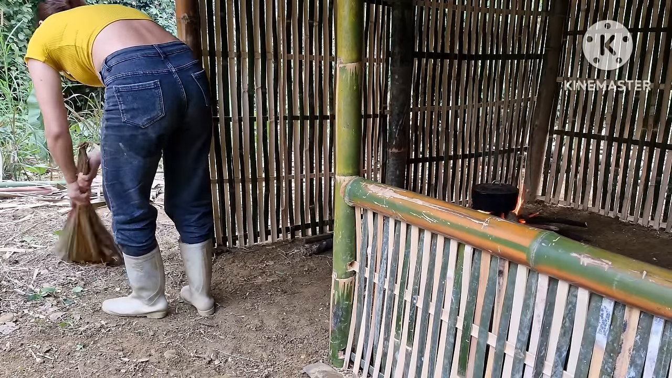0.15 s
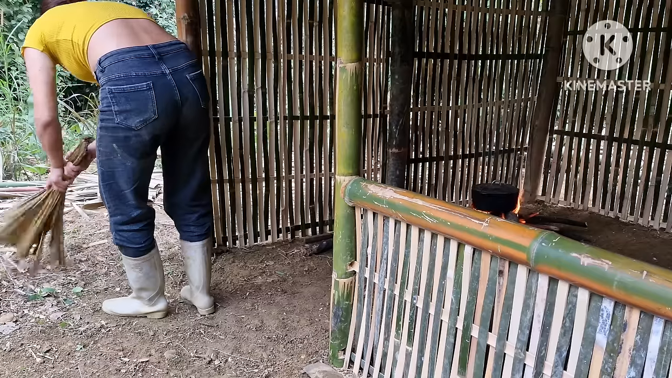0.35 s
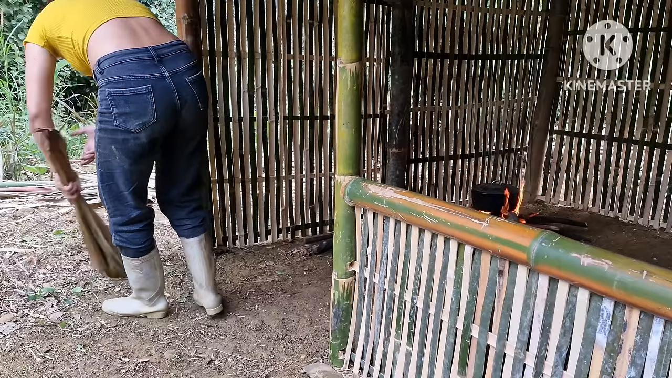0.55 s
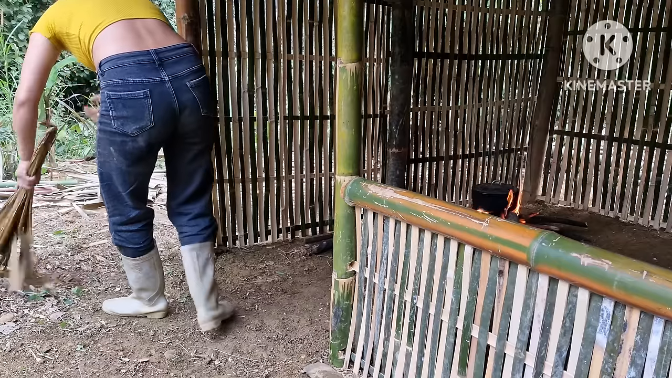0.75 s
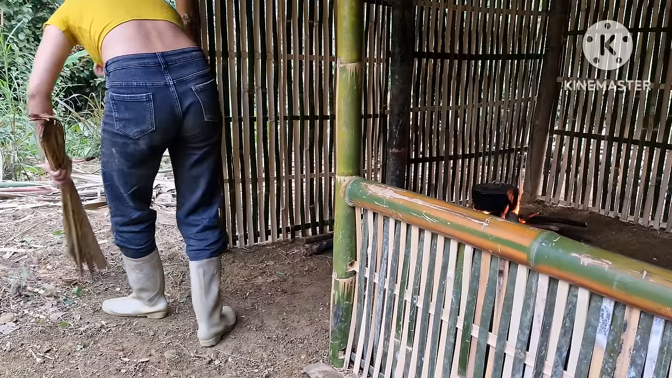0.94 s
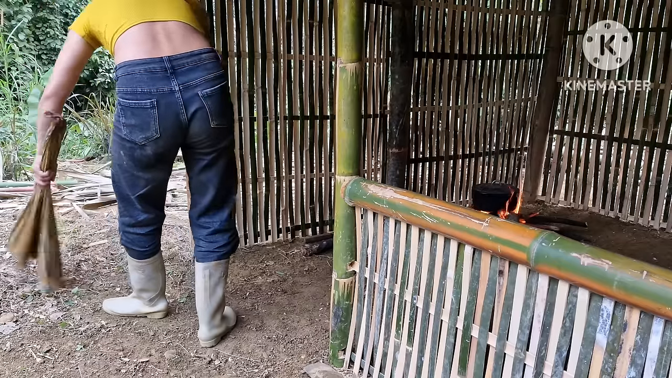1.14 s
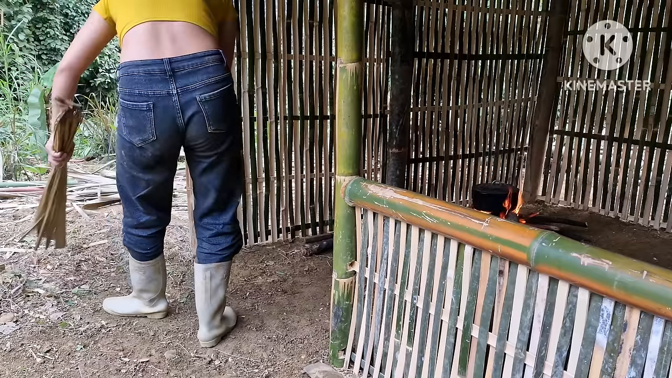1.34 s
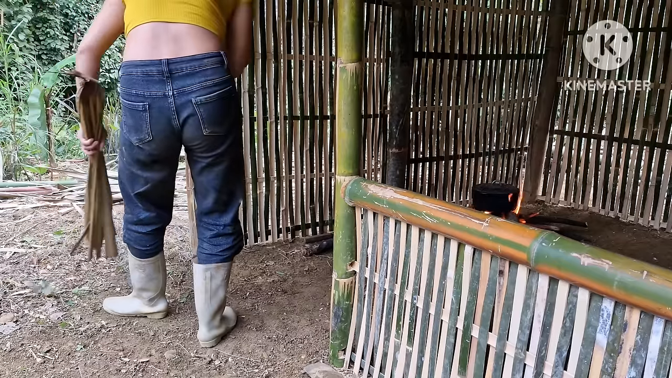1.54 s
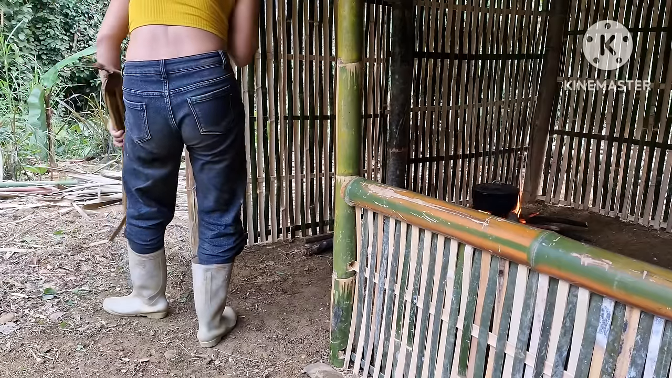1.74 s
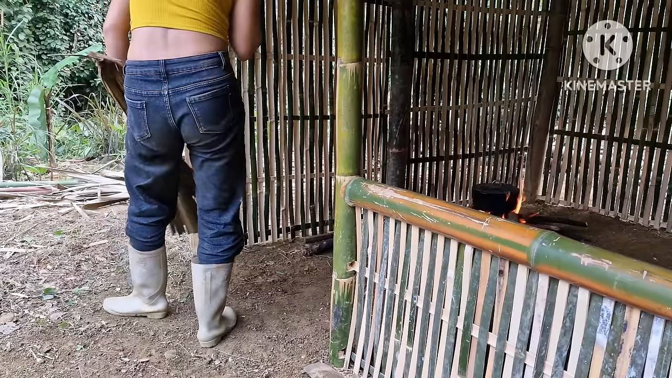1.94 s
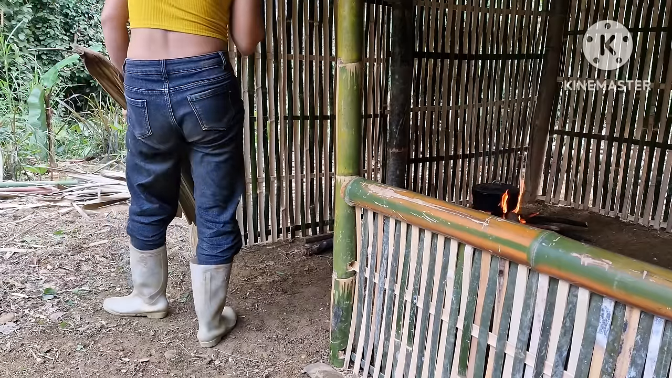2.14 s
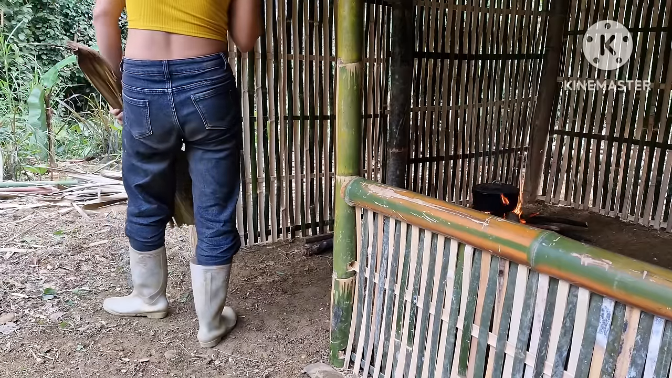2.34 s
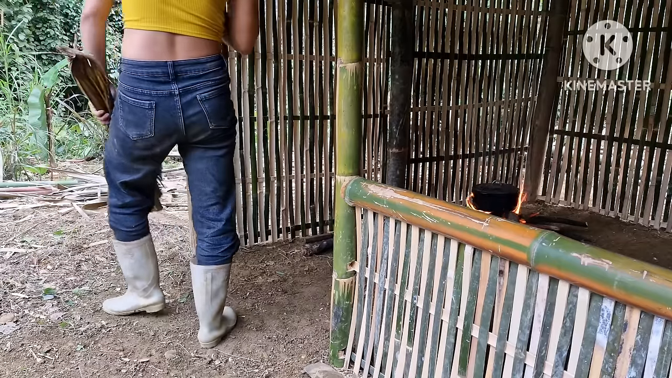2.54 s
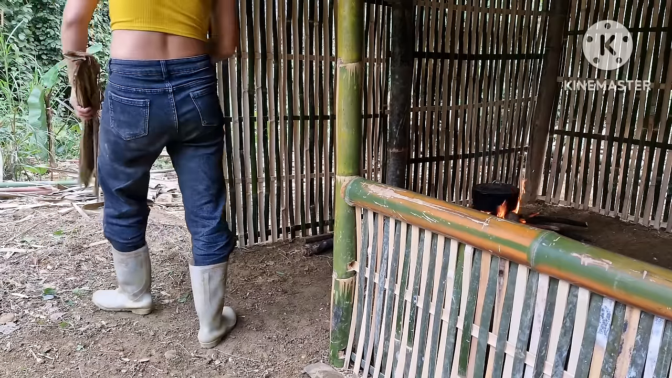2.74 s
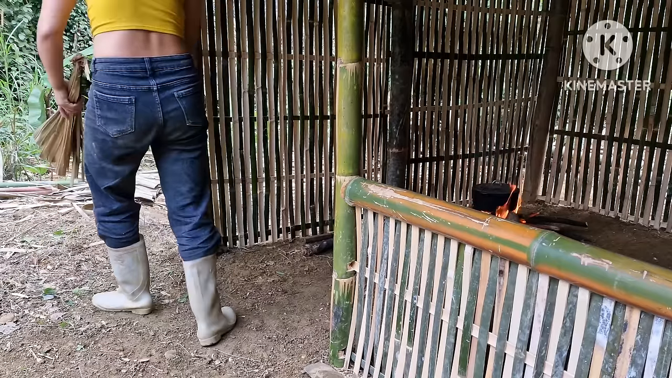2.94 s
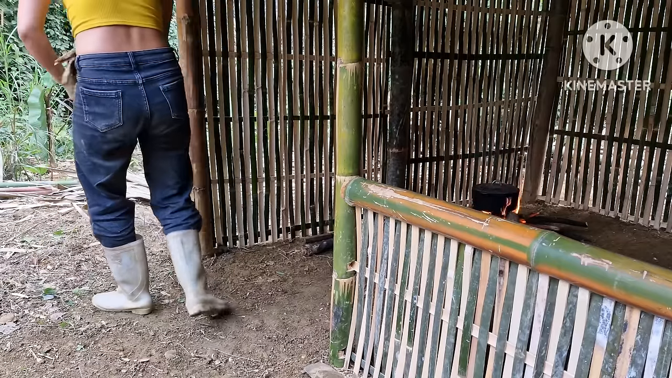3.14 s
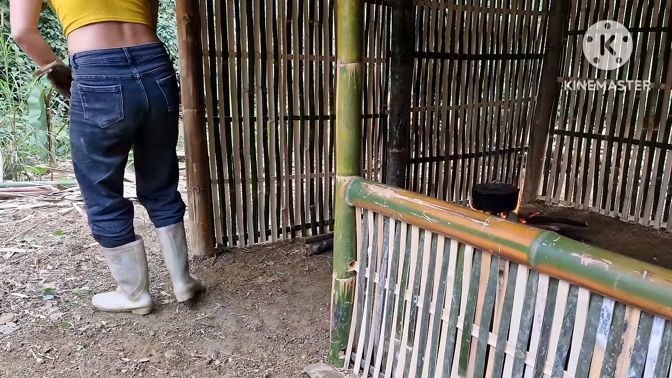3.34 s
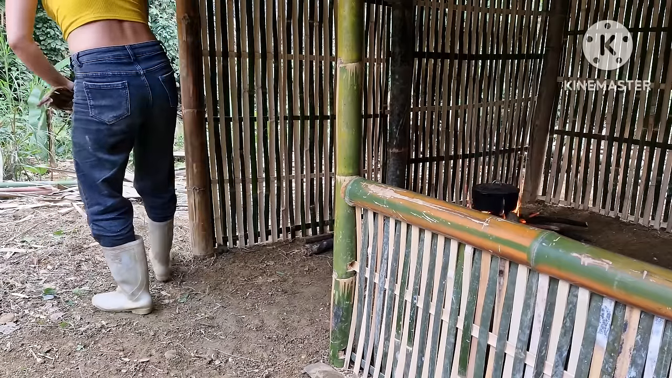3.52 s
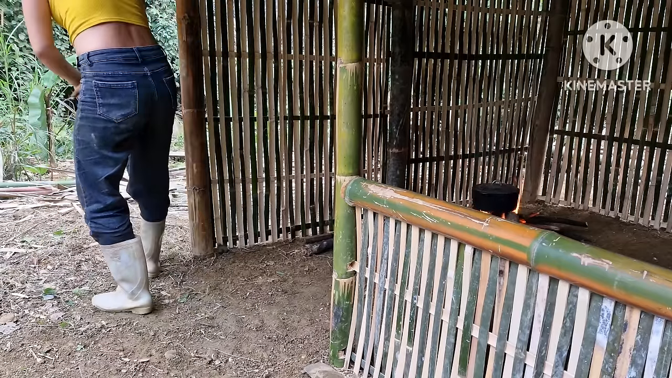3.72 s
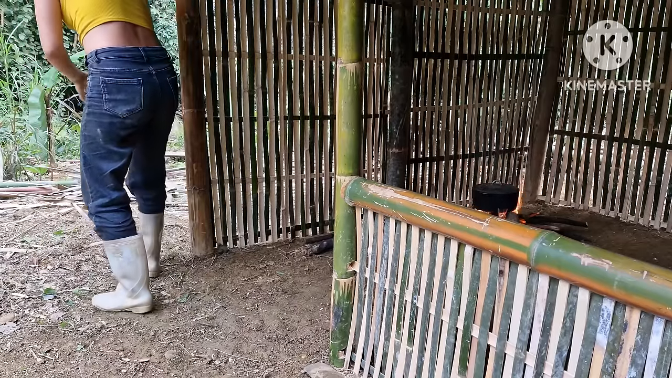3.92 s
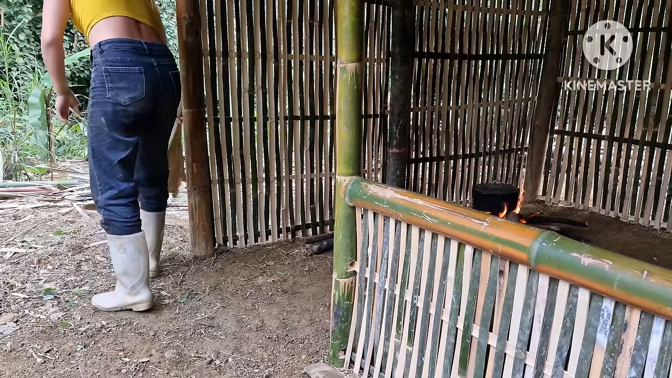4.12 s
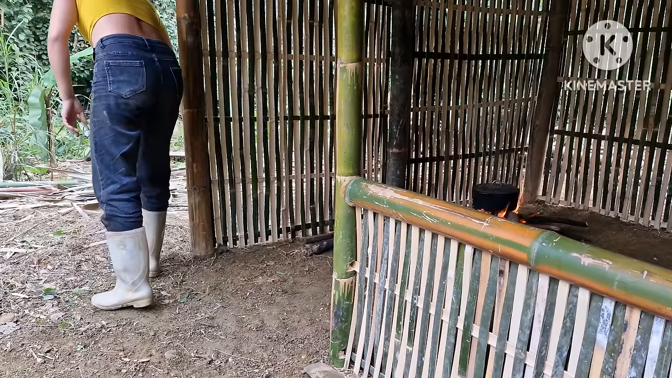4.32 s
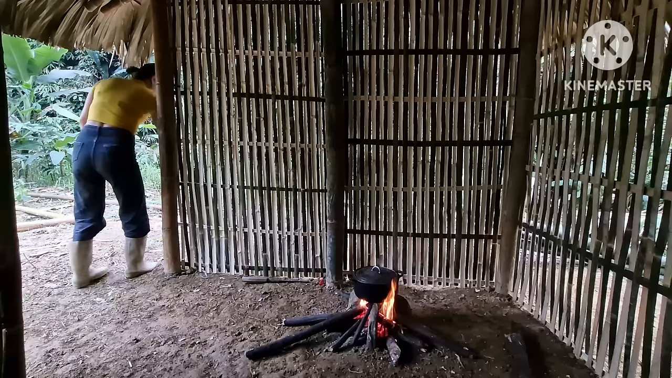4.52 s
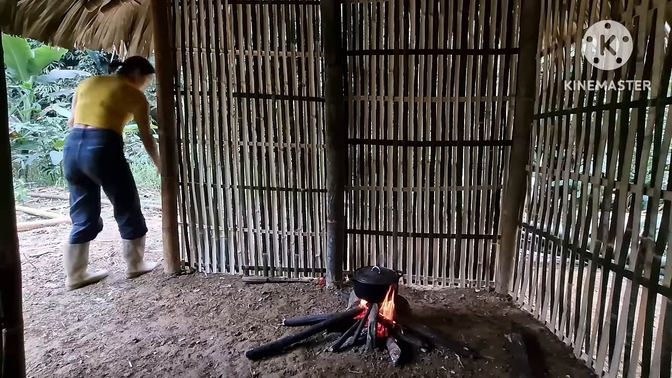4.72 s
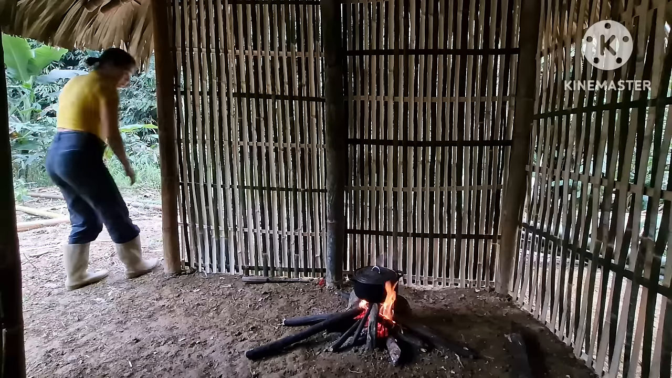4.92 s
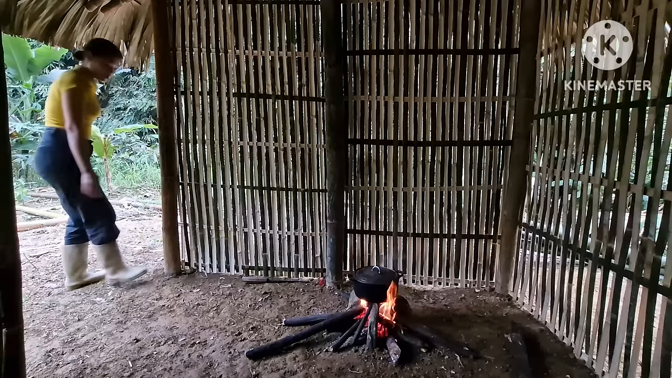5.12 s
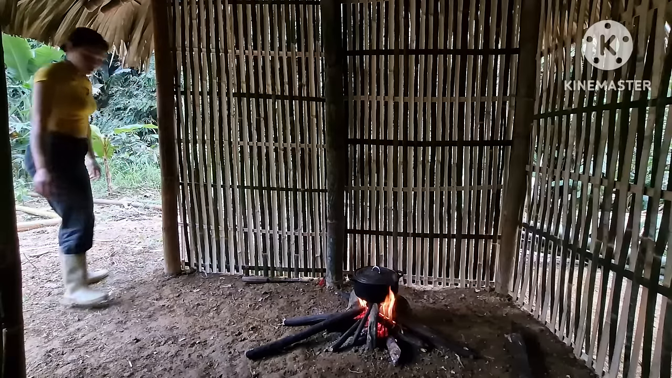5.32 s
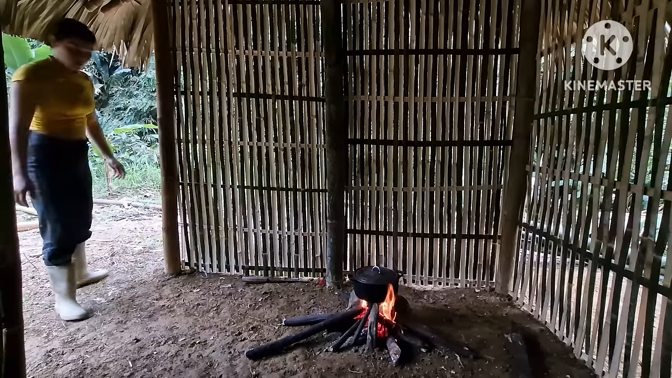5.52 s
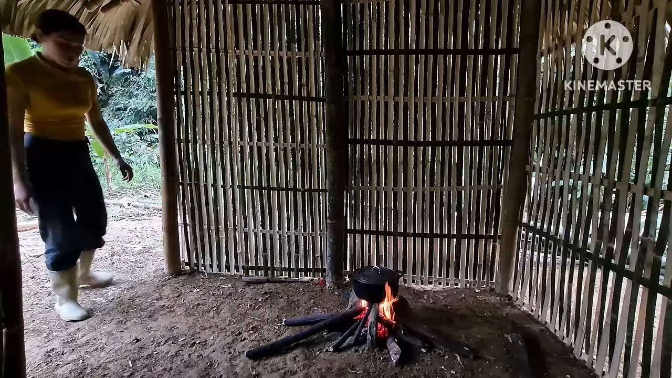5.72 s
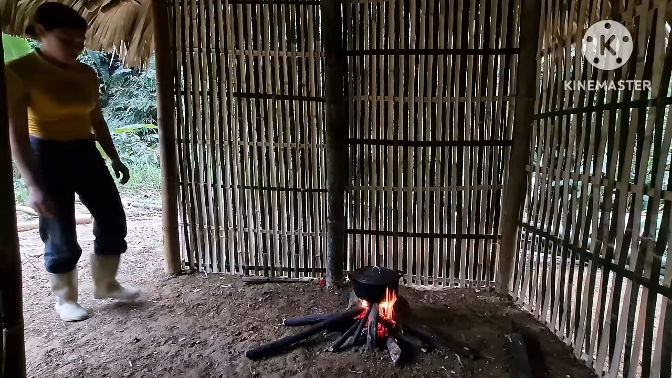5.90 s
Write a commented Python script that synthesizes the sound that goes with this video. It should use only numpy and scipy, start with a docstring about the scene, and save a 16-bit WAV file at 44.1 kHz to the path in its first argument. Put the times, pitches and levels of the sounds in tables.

```python
"""In a bamboo hut, a broom of dry stalks sweeps the earth floor, rubs the slatted wall and is stood down.
Friction is modelled as decaying ticks (tips and crumbs) over a rush of noise, shaped by stroke pressure;
flicks, twig snaps, rubber-boot treads and knocks are impulses: coloured noise bursts with the hut's answer.
Far birds and insects are sines blurred by scattering; outdoor air is diffuse noise, duller late on."""
import sys
import numpy as np
from scipy import signal
from scipy.fft import rfft, irfft, next_fast_len
from scipy.io import wavfile
from scipy.ndimage import uniform_filter1d, map_coordinates

SR = 44100
rng = np.random.default_rng(int(sys.argv[2]) if len(sys.argv) > 2 else 0)


def transcribe(u):
    """Save the signal u as a 16-bit wav file named by the first command-line argument.

    u: samples, shape (n,) or (channels, n), limited to [-1, 1]; the rate is SR.
    q: integer samples, one column per channel.
    """
    v = np.clip(np.atleast_2d(u).T, -1, 1)
    q = np.round(v * 32767).astype(np.int16)
    wavfile.write(sys.argv[1], SR, q)


N = 267244
SPLIT_HZ, TOP_HZ = 3200, 15750  # crossover between scrape and hiss; upper band limit

# Sweeping strokes, the first already lifting at the start, its tips still trailing:
# (tips touch [s], lead-in [s], press [s], trail [s],
# bite [dB/s], relative press [dB], relative drag of the tips [dB], chatter [Hz])
STROKES = [(-0.3, 0.11, 0.12, 0.25, 314, -32, -58, 4830), (0.163, 0.077, 0.14, 0.18, 520, -32, -48, 4950),
           (0.616, 0.1, 0.11, 0.053, 300, -33, -40.5, 5130),
           (1.078, 0.064, 0.076, 0.068, 367, -33, -48.5, 5350)]
# Snags on crumbs: (time [s], relative earth scrape [dB], relative stalk hiss [dB])
SNAGS = [(0.169, -55, -44), (0.197, -44, -53), (0.358, -30, -31), (0.489, -47, -40), (0.541, -53, -43.5),
         (0.752, -31, -31), (0.915, -42.5, -40.5), (0.957, -45.5, -44.5), (1.155, -31.5, -46)]
# Single stalks flicking free: (time [s], relative level [dB])
STALK_FLICKS = [(0.162, -30), (0.2443, -26), (0.62, -30.5), (0.839, -15), (0.848, -13.5), (0.8584, -16),
                (1.0813, -36), (1.111, -23), (1.2, -18.5), (1.226, -20.5), (1.2948, -32), (1.302, -24.5)]
# Drags over the wall: (time [s], hold [s], relative rub [dB], relative stalk hiss [dB])
WALL_RUBS = [(2.1, 0.022, -56.5, -51.5), (2.213, 0.011, -45.5, -44), (2.434, 0.027, -48.5, -47.5),
             (3.178, 0.048, -51, -44.5), (3.193, 0.019, -40, -50), (3.278, 0.044, -50, -48),
             (3.314, 0.02, -47, -51), (3.454, 0.039, -50, -48), (3.567, 0.071, -51, -50.5),
             (3.643, 0.019, -40.5, -42.5), (3.704, 0.038, -53.5, -51), (3.796, 0.069, -59, -57),
             (3.871, 0.024, -52.5, -51), (4.101, 0.091, -59, -56.5), (4.203, 0.16, -59, -60.5),
             (4.377, 0.044, -47, -48)]
# Shoves of the broom's head onto the ground: (full weight [s], hold [s], build-up [dB/s],
# earth scrape [dB], stalk hiss [dB])
HEAD_SHOVES = [(4.463, 0.0061, 1103, -36, -41.5), (4.539, 0.036, 345, -35, -44)]
# Dull knocks: (time [s], level [dB])
DULL_KNOCKS = [(3.72, -21.5), (3.746, -22), (4.645, -19), (5.548, -27)]
# Dry wood snaps: (time [s], relative level [dB], relative woody body [dB], ring [Hz])
WOOD_SNAPS = [(1.368, -28, -6.5, 8200), (1.537, -40, -5, 5640), (1.665, -28, -19, 11500),
              (1.782, -29.5, -8.5, 3660), (1.978, -34.5, -3.5, 5700), (2.096, -30.5, -15, 7100),
              (2.218, -24.5, -6, 10700), (2.397, -34.5, -5, 2900), (2.464, -30.5, -8, 8140),
              (3.191, -35.5, -6, 8250), (3.238, -30, -16, 13000), (3.400, -34.5, -3, 4500),
              (3.458, -33.5, -7.5, 4800), (3.653, -32.5, 5.5, 2520), (3.720, -34, -10, 4320),
              (4.104, -33.5, -30, 12900), (4.36, -39, 1, 2080), (4.388, -30, -11, 2080),
              (4.432, -22, -8.5, 13300), (5.304, -40, -14, 5830), (5.376, -35.5, -15, 5400)]
# Soft boot treads: (time [s], relative level [dB])
BOOT_TREADS = [(1.529, -42.5), (3.466, -44), (5.07, -42), (5.349, -40), (5.44, -47), (5.546, -44),
               (5.624, -40.5), (5.721, -40)]
# Far birds and insects: (time [s], length [s], start [Hz], end [Hz], blur [Hz], relative level [dB])
CHIRPS = [(2.569, 0.073, 539, 530, 90, -70.5), (2.634, 0.039, 5200, 5300, 260, -77),
          (2.71, 0.026, 5500, 4380, 260, -73), (4.687, 0.43, 4220, 4250, 480, -83),
          (5.643, 0.46, 4320, 4370, 450, -83), (5.747, 0.31, 4750, 4850, 90, -84)]
# Outdoor air: (time [s], level [dB])
AIR_LEVEL = [(0, -53.5), (1.5, -57.5), (3, -58), (4.55, -57), (4.68, -65.5), (4.8, -61.5), (5.25, -61.5),
             (5.6, -57.5), (6.06, -58.5)]

# Spectrum of earth scraped by the bundle: (frequency [Hz], relative density [dB])
EARTH_SPECTRUM = [(25, -42), (45, -16), (70, -6), (150, -3), (300, 2), (430, -5.5), (620, 0.5), (820, -6.5),
                  (1090, 2), (1280, -0.5), (1550, 4.5), (1850, 0.5), (2250, 5.5), (3200, -1)]
# Spectrum of hissing stalks: (frequency [Hz], relative density [dB])
STALK_SPECTRUM = [(3000, -1.5), (3900, -3.5), (4450, -1), (5500, -0.5), (6200, -1.5), (7700, -3),
                  (8600, -1), (9700, -6), (13000, -3.5), (15500, -9)]
# Spectrum of bamboo and woody bodies: (frequency [Hz], relative density [dB])
BAMBOO_SPECTRUM = [(25, -38), (60, -23), (200, -12), (310, 0.5), (420, -13.5), (600, -5), (800, -4),
                   (1100, 2.5), (1500, 0), (2200, 2), (3200, -7)]
# Spectrum of ground under the shoved head: (frequency [Hz], relative density [dB])
GROUND_SPECTRUM = [(25, -28), (65, -11), (110, -5.5), (280, -1.5), (440, -5.5), (620, -2.5), (770, -9.5),
                   (1000, -1), (1200, -9.5), (1550, -3), (1800, -3), (2100, -2), (2600, -10.5)]
# Spectrum of stalk tips on wall and ground: (frequency [Hz], relative density [dB])
TIP_SPECTRUM = [(3000, -3), (4800, 1), (7000, -6.5), (10000, -3.5), (13500, -7.5), (15500, -9)]
# Spectrum of the splaying tips: (frequency [Hz], relative density [dB])
SPLAY_SPECTRUM = [(3000, -14), (8000, -1.5), (13000, 1.0)]
# Spectrum of a dull knock: (frequency [Hz], relative density [dB])
KNOCK_SPECTRUM = [(60, -28), (300, -6), (580, 12), (850, -4), (1200, -3.5), (2100, 2.5), (2600, -20)]
# Spectrum of a cracking twig: (frequency [Hz], relative density [dB])
CRACK_SPECTRUM = [(3000, -3.5), (9000, -2), (15500, -10.5)]
# Spectrum of a rubber sole's thud: (frequency [Hz], relative density [dB])
BOOT_SPECTRUM = [(70, -31), (130, 2.5), (235, -2.5), (285, 14), (350, -6.5), (700, -17)]
# Spectrum of the earlier air: (frequency [Hz], relative density [dB])
EARLY_AIR_SPECTRUM = [(18, -48), (30, -33), (108, -8.5), (177, -10.5), (249, -4), (369, -10), (532, -5.5),
                      (728, -8.5), (1260, -9), (1720, -6), (2250, -8.5), (2910, -17), (4780, -15.5),
                      (7260, -22), (13300, -23.5), (15500, -30)]
# Spectrum of the later, duller air: (frequency [Hz], relative density [dB])
LATE_AIR_SPECTRUM = [(18, -57), (30, -25), (59, -23), (95, -21), (168, -9), (230, -10.5), (284, -9.5),
                     (591, -14.5), (945, -14.5), (1200, -17.5), (1330, -16), (2690, -22.5), (4780, -24.5),
                     (5890, -29), (15500, -31)]
# Decay of the hut's answer: (frequency [Hz], time to fall 60 dB [s])
HUT_DECAY = [(100, 0.034), (1000, 0.12), (5000, 0.13), (15000, 0.13)]
# Left-right correlation of diffuse sound: (frequency [Hz], correlation [-1 to 1])
DIFFUSE_LIKENESS = [(60, 0.8), (250, 0.88), (550, 0.64), (900, -0.035), (1500, -0.065), (2500, 0.034)]

TOUCH_S, TRAIL_DB_PER_S = 0.0022, 195  # the tips land at once and trail off
LIFT_DB_PER_S = 189  # how fast the pressure goes
DRAG_EARTH_DB = -1.5  # tips alone scrape less than they hiss
BEND_DB, BEND_LAG_S = 2.5, 0.0044  # hiss gained through a press; its delay behind the scrape
CHATTER_DB, CHATTER_RISE_HZ = -6.5, 398  # bright band of bent stalks; its rise through a press
SNAG_HOLD_S, SNAG_FALL_DB_PER_S = 0.0081, 526
CATCH_ATTACK_S = 0.014  # onset of wall rubs and of snags
RUB_FALL_DB_PER_S, SHOVE_FALL_DB_PER_S = 320, 415
SPLAY_S, SPLAY_DB, SPLAY_FALL_DB_PER_S = 4.431, -31, 307  # the tips first meet the ground
RATTLE_DB = 2.5  # the slats' answer to a snap


def sweep():
    """Sliding friction: the bundle scrapes the earth while its thin stalks hiss over grit."""
    scrape, hiss, chatter_hz = stroke_controls()
    crumbs = grit(rate=900, pitch_hz=1500, cycles=1.06, spread_db=3.5)
    tips = grit(rate=900, pitch_hz=7500, cycles=1.6, spread_db=4.3)
    earth = friction(crumbs, rush_db=-6, clump_db=1.1, wet_db=6, lag_ms=.255, pan_db=-1.5)
    stalks = friction(tips, rush_db=-3, clump_db=1.2, wet_db=5, lag_ms=.215, pan_db=2.5)
    pressure = hiss / hiss.max()
    bright = unit(high(stalks, STALK_SPECTRUM)) + amp(CHATTER_DB) * pressure * chatter(chatter_hz)
    return amp(-1.26) * scrape * unit(low(earth, EARTH_SPECTRUM)) + hiss * bright


def chatter(center_hz):
    """Frequency shifting: low noise moved up to one bright band that slides as the stalks bend."""
    band = unit(filtered(diffuse(size=N), lambda hz: 1 / np.sqrt(1 + (hz / 650) ** 8)))
    phase = 2 * np.pi * np.cumsum(center_hz) / SR
    # opposite rotations fill the band above and below its centre
    rotation = np.exp(1j * phase * [[1], [-1]])
    shifted = np.real(signal.hilbert(band) * rotation).sum(axis=0)
    return unit(ports(shifted, lag_ms=.05, pan_db=2))


def stroke_controls():
    """Addition of powers: scrape and hiss from drag, press and snags; bending raises hiss and chatter."""
    scrape_power, hiss_power, chatter_hz = np.zeros((3, N))
    t = np.arange(N) / SR
    for touch, lead_in, press, trail, bite_db_per_s, press_db, drag_db, hz in STROKES:
        bite = touch + lead_in
        drag = amp(drag_db) * contact(touch, lead_in + press + trail, TOUCH_S, TRAIL_DB_PER_S)
        bend = np.clip((t - bite) / press, 0, 1) - .5
        earth_press = amp(press_db) * swell(bite, press, bite_db_per_s, LIFT_DB_PER_S)
        late_press = swell(bite + BEND_LAG_S, press, bite_db_per_s, LIFT_DB_PER_S)
        stalk_press = amp(press_db + BEND_DB * bend) * late_press
        scrape_power += earth_press ** 2 + (amp(DRAG_EARTH_DB) * drag) ** 2
        hiss_power += stalk_press ** 2 + drag ** 2
        chatter_hz = np.where(t >= touch, hz + CHATTER_RISE_HZ * bend, chatter_hz)
    for s, scrape_db, hiss_db in SNAGS:
        surge = contact(s, SNAG_HOLD_S, CATCH_ATTACK_S, SNAG_FALL_DB_PER_S)
        scrape_power += (amp(scrape_db) * surge) ** 2
        hiss_power += (amp(hiss_db) * surge) ** 2
    return np.sqrt(scrape_power), np.sqrt(hiss_power), chatter_hz


def flicks():
    """Elastic release: a bent stalk springs loose and ticks."""
    out = np.zeros((2, N))
    for s, db in STALK_FLICKS:
        tick = hit(t60=.008, wet_db=-6, lag_ms=.23, pan_db=1.5)
        add(out, s, amp(db + 12.5) * sized(high(tick, STALK_SPECTRUM)))
    return out


def wall_rub():
    """Intermittent friction: stalks drag over the bamboo slats in short scratches."""
    rub_power, hiss_power = np.zeros((2, N))
    for s, hold, rub_db, hiss_db in WALL_RUBS:
        drag = contact(s, hold, CATCH_ATTACK_S, RUB_FALL_DB_PER_S)
        rub_power += (amp(rub_db) * drag) ** 2
        hiss_power += (amp(hiss_db) * drag) ** 2
    scratches = grit(rate=680, pitch_hz=4580, cycles=0.44, spread_db=7.0)
    slips = friction(scratches, rush_db=6.0, clump_db=1.5, wet_db=11.0, lag_ms=0.14, pan_db=-0.5)
    rub = amp(-1.0) * np.sqrt(rub_power) * unit(low(slips, BAMBOO_SPECTRUM))
    hiss = amp(-1.6) * np.sqrt(hiss_power) * unit(high(slips, TIP_SPECTRUM))
    return rub + hiss


def set_down():
    """Friction under load: the tips splay with a crackle, then the head crunches onto the ground."""
    scrape, hiss = np.zeros((2, N))
    for s, hold, rise_db_per_s, scrape_db, hiss_db in HEAD_SHOVES:
        weight = swell(s, hold, rise_db_per_s, SHOVE_FALL_DB_PER_S)
        scrape += amp(scrape_db) * weight
        hiss += amp(hiss_db) * weight
    crunch = grit(rate=1000, pitch_hz=4370, cycles=0.91, spread_db=-1.5)
    slips = friction(crunch, rush_db=-0.5, clump_db=1.2, wet_db=7.5, lag_ms=0.15, pan_db=-0.5)
    splay = amp(SPLAY_DB) * contact(SPLAY_S, 0, TOUCH_S, SPLAY_FALL_DB_PER_S)
    crackle = splay * unit(high(slips, SPLAY_SPECTRUM))
    ground = scrape * unit(low(slips, GROUND_SPECTRUM))
    return crackle + ground + hiss * unit(high(slips, TIP_SPECTRUM))


def knocks():
    """Damped impact: something hard bumps the ground and stops dead."""
    out = np.zeros((2, N))
    for s, db in DULL_KNOCKS:
        bump = hit(t60=0.04, wet_db=-31, lag_ms=0.12, pan_db=-1.0)
        add(out, s, amp(db) * sized(low(bump, KNOCK_SPECTRUM)))
    return out


def snaps():
    """Fracture and resonance: dry wood ticks and rings over a woody body, and the hut answers."""
    out = np.zeros((2, N))
    for s, db, body_db, ring_hz in WOOD_SNAPS:
        crack = hit(t60=.0045, wet_db=RATTLE_DB, lag_ms=.1, pan_db=1.2)
        # a resonance of quality factor 4
        ring = filtered(crack, lambda hz: 1 / (1 + 4j * (hz - ring_hz ** 2 / (hz + 1)) / ring_hz))
        tick = sized(sized(high(crack, CRACK_SPECTRUM)) + amp(-4.0) * sized(ring))
        body = amp(body_db + 3.0) * sized(low(crack, BAMBOO_SPECTRUM))
        add(out, s, amp(db + 11.0) * (tick + body))
    return out


def treads():
    """Soft impact: a rubber sole thuds on packed earth."""
    out = np.zeros((2, N))
    for s, db in BOOT_TREADS:
        thud = hit(t60=0.16, wet_db=-10.0, lag_ms=0.16, pan_db=4.5)
        add(out, s, amp(db + 15.0) * sized(low(thud, BOOT_SPECTRUM)))
    return out


def wildlife():
    """Multiple scattering: thin gliding whistles and trills, blurred on their way through the trees."""
    out = np.zeros((2, N))
    for s, length, start_hz, end_hz, blur_hz, db in CHIRPS:
        n = int(length * SR)
        phase = 2 * np.pi * np.cumsum(np.linspace(start_hz, end_hz, n)) / SR
        whistle = signal.windows.tukey(n, .5) * np.sin(phase)
        noise = rng.standard_normal((2, SR))
        # slow random gain, which widens the whistle's spectral line
        scatter = unit(filtered(noise, lambda hz: np.exp(-(2 * hz / blur_hz) ** 2 / 2)))
        add(out, s, amp(db + 12.5) * whistle * scatter[:, :n])
    return out


def air():
    """Diffuse field: a soft, wavering outdoor rush, crossfaded by power to a duller one."""
    level, = gains(AIR_LEVEL)
    late = np.interp(np.arange(N) / SR, [4.58, 4.68], [0, 1])
    early_rush, late_rush = air_rush(EARLY_AIR_SPECTRUM), air_rush(LATE_AIR_SPECTRUM)
    breeze = np.sqrt(1 - late) * early_rush + np.sqrt(late) * late_rush
    return level * unit(patchy(breeze, depth_db=1.9, size=2048))


def air_rush(spectrum):
    """Spectral shaping: diffuse noise coloured by one air spectrum."""
    return unit(filtered(diffuse(size=N), lambda hz: amp(along(spectrum, hz))))


def friction(grains, rush_db, clump_db, wet_db, lag_ms, pan_db):
    """Stick and slip: grains on a rush, catching in clumps as different stalks take the load."""
    direct = ports(grains + amp(rush_db) * rng.standard_normal(N), lag_ms, pan_db)
    slips = (direct + amp(wet_db) * diffuse(size=N)) * amp(clump_db * wobble(170))
    return patchy(slips, depth_db=1.3, size=512)


def grit(rate, pitch_hz, cycles, spread_db):
    """Damped vibration: tips and crumbs tick rate times a second, each at its own pitch and strength."""
    place, u, size, sign = rng.random((int(rate * N / SR), 4)).T[:, :, None]
    hz = np.clip(pitch_hz * 2 ** (4 * u - 2), 200, TOP_HZ)  # two octaves either way
    k = np.arange(SR // 200)
    life = hz * k / SR / max(cycles, .2)
    strength = amp(spread_db * np.minimum(-np.log(size), np.pi)) * np.sqrt(hz)
    ticks = np.sign(sign - .5) * strength * np.exp(-life) * np.sin(2 * np.pi * hz * k / SR)
    positions = (place * N).astype(int) + k
    return unit(np.bincount(positions.ravel(), ticks.ravel(), N)[:N])


def hit(t60, wet_db, lag_ms, pan_db):
    """Impulsive excitation: a decaying puff of noise, with the hut's answer."""
    t = np.arange(SR // 3) / SR
    puff = rng.standard_normal(len(t)) * amp(-60 * t / max(t60, .001))
    return ports(puff / np.linalg.norm(puff), lag_ms, pan_db) + amp(wet_db) * hut_tail()


def hut_tail():
    """Reverberant decay: a fresh short scatter from the slats, its left channel of energy 1."""
    hz, t, z = signal.stft(diffuse(size=SR // 3), SR, nperseg=256)
    decay = amp(-60 * t / along(HUT_DECAY, hz)[:, None])
    tail = signal.istft(z * decay, SR, nperseg=256)[1][:, :SR // 3]
    return tail / np.linalg.norm(tail[0])


def ports(x, lag_ms, pan_db):
    """Interaural differences: the left port leads by lag_ms and is louder by pan_db."""
    sides = np.array([[.5], [-.5]])
    return filtered(x, lambda hz: np.exp(2j * np.pi * hz * sides * lag_ms / 1000)) * amp(sides * pan_db)


def diffuse(size):
    """Spatial correlation: noise from all sides, most alike at both ports in the bass."""
    def mid_side(hz):
        turn = np.arccos(np.clip(along(DIFFUSE_LIKENESS, hz), -1, 1)) / 2
        return np.array([np.cos(turn), np.sin(turn)])
    mid, side = filtered(rng.standard_normal((2, size)), mid_side)
    return np.array([mid + side, mid - side])


def patchy(x, depth_db, size):
    """Random spectral modulation: a larger size gives narrower, slower patches."""
    z = signal.stft(x, nperseg=size)[2]
    field = rng.standard_normal(z.shape[1:])
    for axis in (0, 1):
        field = uniform_filter1d(field, size=4, axis=axis)
    return signal.istft(z * amp(depth_db * field / field.std()), nperseg=size)[1][:, :N]


def swell(start, hold, rise_db_per_s, fall_db_per_s):
    """Exponential growth and decay: a gain that climbs to 1 at start, holds and dies away."""
    t = np.arange(N) / SR - start
    return amp(-rise_db_per_s * np.maximum(-t, 0) - fall_db_per_s * np.maximum(t - hold, 0))


def contact(start, hold, attack_s, fall_db_per_s):
    """Sudden contact, exponential decay: a gain that opens at start and dies away after hold."""
    t = np.arange(N) / SR - start
    return np.clip(t / attack_s, 0, 1) * amp(-fall_db_per_s * np.maximum(t - hold, 0))


def wobble(rate):
    """Random fluctuation: a smooth curve with rate knots a second."""
    knots = rng.standard_normal(int(N * rate / SR) + 4)
    return map_coordinates(knots, [np.arange(N) * rate / SR])


def gains(rows):
    """Logarithmic levels: one gain per sample for each dB column, -120 dB outside the rows."""
    s, *columns = np.transpose(rows)
    t = np.arange(N) / SR
    return [amp(np.interp(t, s, db, left=-120, right=-120)) for db in columns]


def low(x, spectrum):
    """Low-pass crossover: colour x and keep what lies under the split."""
    return filtered(x, lambda hz: amp(along(spectrum, hz)) / np.sqrt(1 + (hz / SPLIT_HZ) ** 20))


def high(x, spectrum):
    """High-pass crossover: colour x and keep what lies over the split."""
    return filtered(x, lambda hz: amp(along(spectrum, hz)) / np.sqrt(1 + (SPLIT_HZ / (hz + 1)) ** 20))


def filtered(x, response):
    """Linear filtering: the spectrum of x times a complex response of frequency."""
    n = x.shape[-1]
    m = next_fast_len(n + 4096)
    return irfft(rfft(x, m) * response(np.fft.rfftfreq(m, 1 / SR)), m)[..., :n]


def along(points, hz):
    """Logarithmic frequency: (frequency [Hz], value) points interpolated on a log axis."""
    f, v = np.transpose(points)
    return np.interp(np.log(hz + 1), np.log(f + 1), v)


def amp(db):
    """Decibel law: amplitude ratio of a level."""
    return 10 ** (np.asarray(db) / 20)


def unit(x):
    """Mean power: scale to rms 1; a stereo pair by its middle."""
    return x / np.sqrt(np.mean(np.atleast_2d(x).mean(axis=0) ** 2) + 1e-20)


def sized(x):
    """Signal energy: scale a stereo hit so that its middle has energy 1."""
    return x / np.linalg.norm(x.mean(axis=0))


def add(track, s, sound):
    """Superposition: mix a sound into the track at time s."""
    part = track[..., round(s * SR):][..., :sound.shape[-1]]
    part += sound[..., :part.shape[-1]]


def scene():
    """Superposition of broom, small hits and surroundings."""
    broom = sweep() + flicks() + wall_rub() + set_down()
    small_hits = knocks() + snaps() + treads()
    return broom + small_hits + wildlife() + air()


def record(dry):
    """Band limitation: nothing passes at or above the upper limit."""
    return filtered(dry, lambda hz: hz < TOP_HZ)


dry = scene()
out = record(dry)
transcribe(out)
```